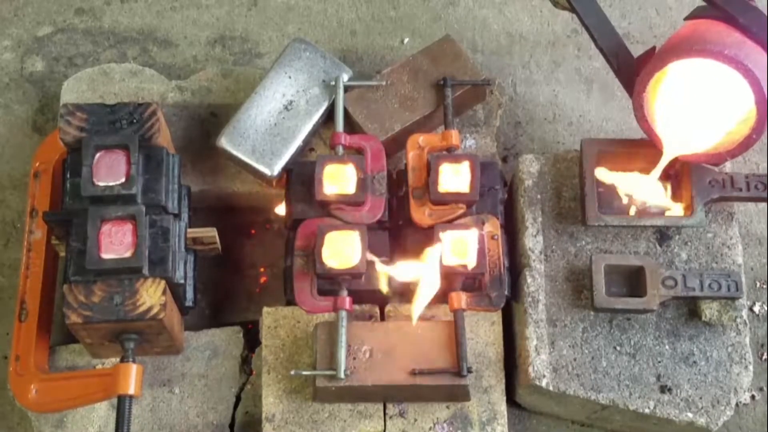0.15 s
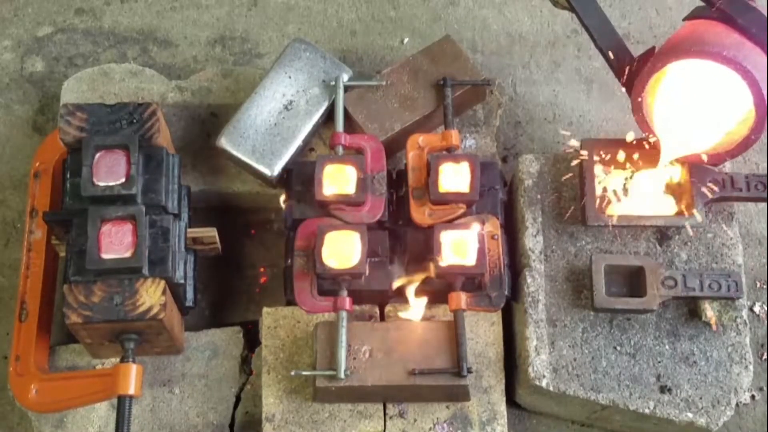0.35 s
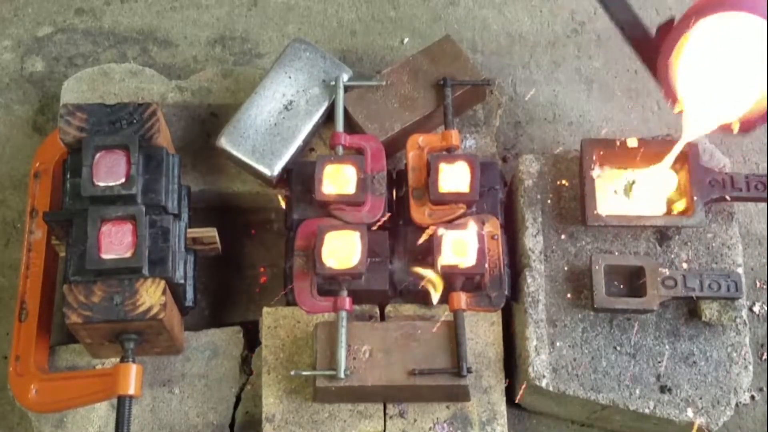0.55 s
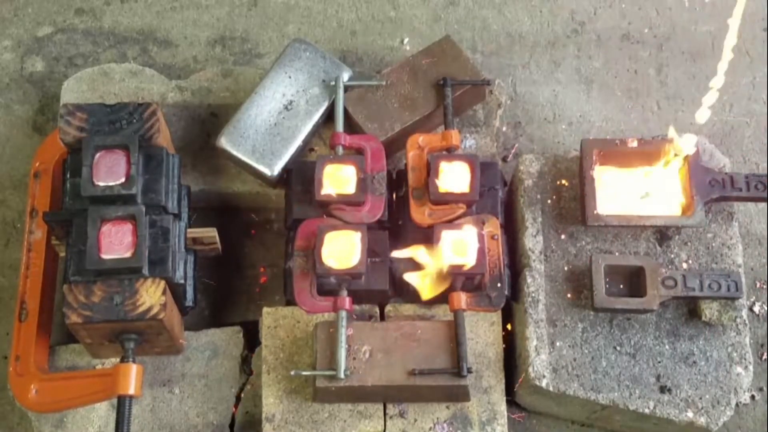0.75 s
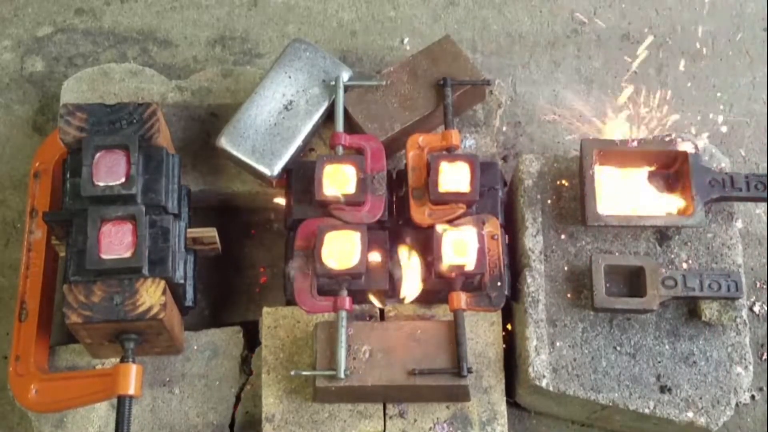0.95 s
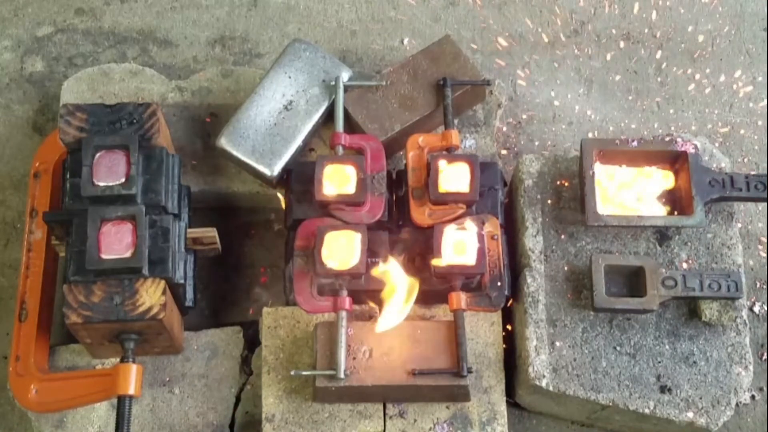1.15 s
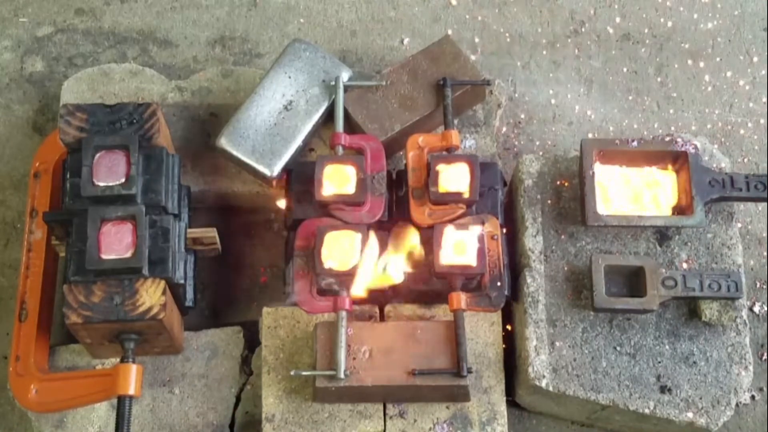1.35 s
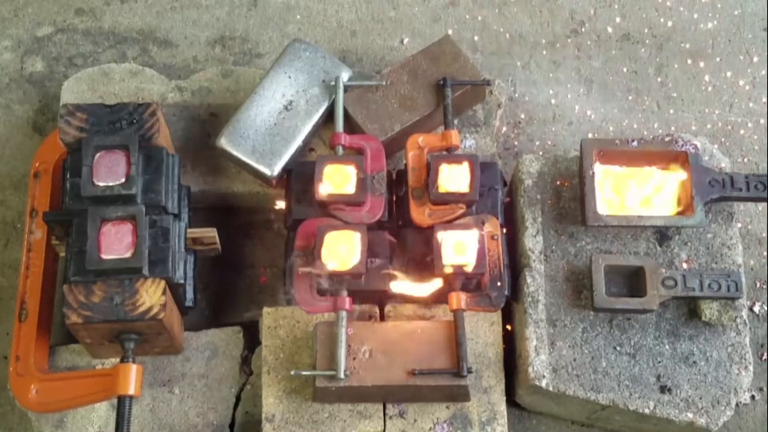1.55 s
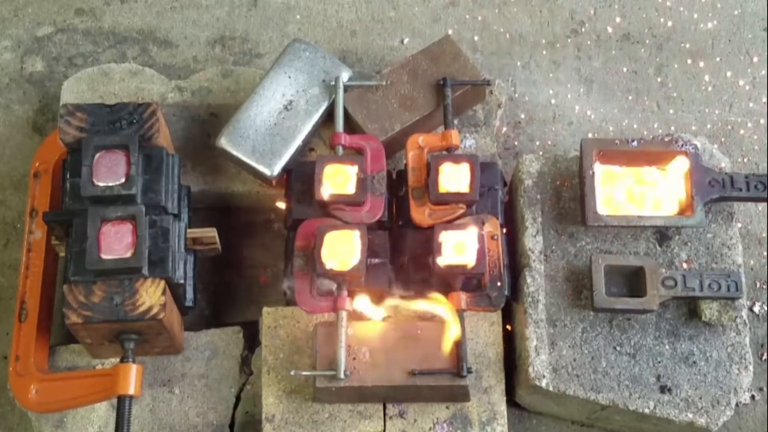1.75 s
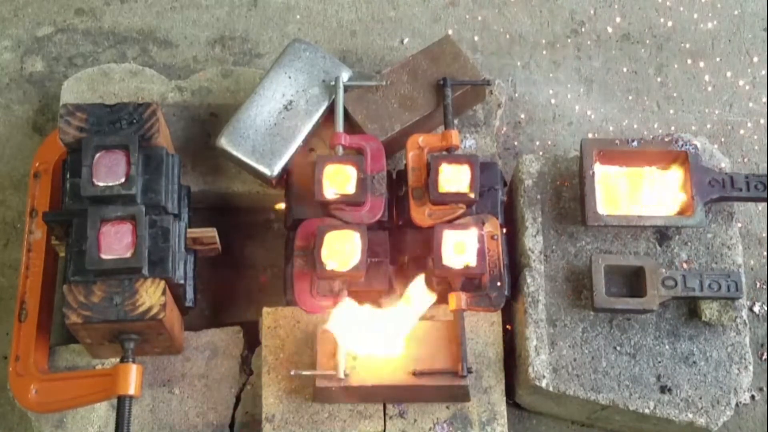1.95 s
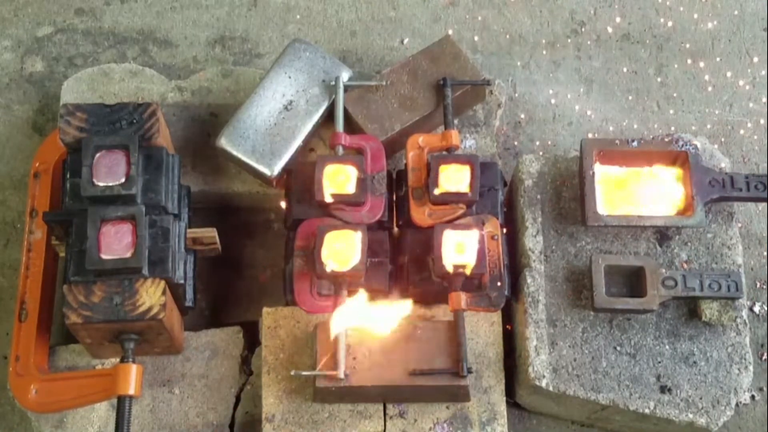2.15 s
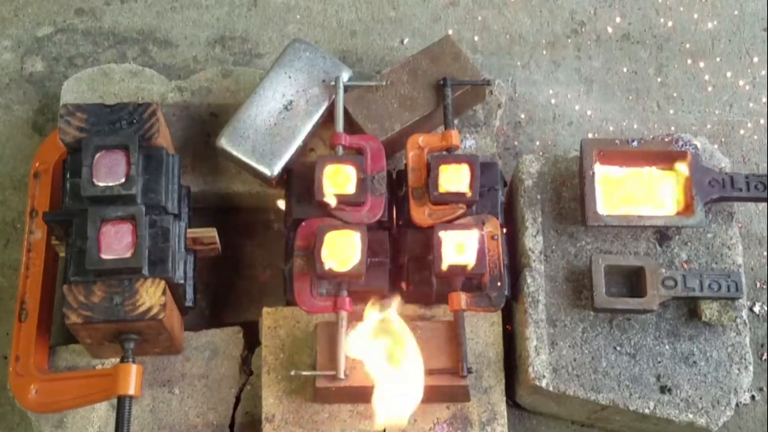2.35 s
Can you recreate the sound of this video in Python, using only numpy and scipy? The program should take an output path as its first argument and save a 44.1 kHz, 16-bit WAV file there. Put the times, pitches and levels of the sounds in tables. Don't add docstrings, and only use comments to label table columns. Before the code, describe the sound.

Molten metal bursts and sizzles into an iron mould with loud steam pops and spitting droplets

```python
import sys
import numpy as np
from scipy import signal
from scipy.fft import rfft, irfft
from scipy.io import wavfile

SR = 44100
rng = np.random.default_rng(int(sys.argv[2]) if len(sys.argv) > 2 else 0)


def unload_wav(signal):
    wavfile.write(
        sys.argv[1],
        SR,
        np.round(np.clip(np.atleast_2d(signal).T, -1, 1) * 32767).astype(np.int16),
    )


def level_to_linear(level):
    exponent = np.asarray(level, float) / 20
    return 10 ** exponent


N = 110250

# [f/Hz, likeness -1..1]
LIKENESS = [(60, 0.37), (240, 0.84), (950, 0.28), (3770, 0.09), (15000, -0.21)]
ONSET_S = .0008


def unit_rms(x):
    return x / np.sqrt(np.mean(x ** 2) + 1e-20)


def in_time(rows):
    s, level_db = np.transpose(rows)
    return np.interp(np.arange(N) / SR, s, level_db)


def at_hz(points, hz):
    points = np.array(points)
    return np.interp(np.log(hz), np.log(points[:, 0]), points[:, 1])


def drift(rate_hz):
    step, settle = 40, 2000
    r = np.exp(-2 * np.pi * rate_hz * step / SR)
    white = rng.standard_normal(N // step + settle + 2)
    slow = signal.lfilter([1], [1, -2 * r, r * r], white)[settle:]
    return np.interp(np.arange(N) / step, np.arange(len(slow)), unit_rms(slow))


def band(x, low, high):
    sos = signal.butter(2, [low, min(high, .45 * SR)], "band", fs=SR, output="sos")
    return signal.sosfilt(sos, x)


def ring(clicks, hz, t60):
    r = level_to_linear(-60 / (t60 * SR))
    w = 2 * np.pi * hz / SR
    return signal.lfilter([0, np.sin(w)], [1, -2 * r * np.cos(w), r * r], clicks + 1e-18)


def partly_alike(noise, low, high):
    mid, side = band(noise, low, high)
    alike = np.clip(at_hz(LIKENESS, np.sqrt(low * high)), -1, 1)
    return np.sqrt(1 + alike) * mid + np.sqrt(1 - alike) * side * [[1], [-1]]


def banded(spectrum, patchy_db, top_hz=20000., grains=0):
    out, power = 0, 0
    together = drift(14)
    edges = 24.5 * 2 ** np.arange(0, 10, .5)
    white = rng.standard_normal((2, 2, N)) + grains
    for k, (low, high) in enumerate(zip(edges, edges[1:])):
        hz = np.sqrt(low * high)
        if spectrum[0][0] < hz < spectrum[-1][0]:
            flicker_db = patchy_db * (.8 * together + .6 * drift(20))
            layer = level_to_linear(at_hz(spectrum, hz) + flicker_db) * partly_alike(white[k % 2], low, high)
            dulling_db = -20 * np.maximum(np.log2(hz / top_hz), 0)
            out = out + layer * level_to_linear(dulling_db)
            power = power + np.mean(layer ** 2)
    return out / np.sqrt(power)


def place(s, shapes):
    out = np.zeros(N + SR)
    for start, shape in zip((np.asarray(s) * SR).astype(int), shapes):
        out[start:start + len(shape)] += shape
    return out[:N]


def clicks_at(rate, spread_db, shape):
    size_db = spread_db * np.minimum(rng.exponential(1, shape), 5)
    sizes = level_to_linear(size_db) * rng.choice([-1, 1], shape)
    return unit_rms(sizes * (rng.random(shape) < rate / SR))


def air():
    # [f/Hz, level/dB per Hz]
    floor_colour = [(15, -47), (25, -2.5), (123, -6), (157, -19), (277, -5.5), (1840, -13.5), (5570, -26),
                    (7110, -20.5), (16000, -23.5)]
    whine_hz, width_hz = 7150, 420
    whine = band(rng.standard_normal((2, N)), whine_hz - width_hz / 2, whine_hz + width_hz / 2)
    floor = level_to_linear(-61.5) * banded(floor_colour, patchy_db=.6)
    return floor + level_to_linear(-74.5 + 3.5 * drift(4)) * unit_rms(whine)


def workshop(x):
    # [delay left/s, delay right/s, level/dB]
    echoes = [(.0011, 0.0016, -23.5), (.0054, .0058, -15.5), (.0114, .0116, -11)]
    # [f/Hz, T60/s]
    room_t60 = [(300, 0.36), (1500, 0.37), (5000, 0.27), (14000, 0.13)]
    room_db, early_db, early_s, tail_starts_s = -2.5, 6, 0.0076, 0.0028
    wall_hz = 12900
    t = np.arange(SR // 2) / SR
    edges = 130 * 2 ** np.arange(0, 8.)
    white, tail = rng.standard_normal((2, 2, len(t))), 0
    for k, (low, high) in enumerate(zip(edges, edges[1:])):
        decay = 1000 ** (-t / at_hz(room_t60, np.sqrt(low * high)))
        tail = tail + partly_alike(white[k % 2], low, high) * decay
    early = 1 + level_to_linear(early_db) * np.exp(-t / early_s)
    build_up = 1 - np.exp(-(t / tail_starts_s) ** 2)
    tail = tail * early * build_up
    near = np.zeros_like(tail)
    for k, (left, right, db) in enumerate(echoes):
        near[[0, 1], [int(left * SR), int(right * SR)]] = level_to_linear(db) * (-1) ** (k + 1)
    energy = np.mean(np.sum(tail ** 2, axis=1))
    answer = level_to_linear(room_db) * tail / np.sqrt(energy) + band(near, 100, wall_hz)
    return signal.fftconvolve(x, answer, axes=1)[:, :N]


def slop():
    # [t/s, level/dB]
    vigour = [(0, -68), (.21, -68), (.3, -58.5), (.9, -56), (1.15, -58), (1.3, -60.5), (2.1, -61),
              (2.5, -62)]
    # [f/Hz, level/dB per Hz]
    flutter_colour = [(59, -46), (100, -5.5), (466, -1), (679, -8), (911, -4.5), (1130, -10.5), (5000, -21),
                      (6500, -70), (11000, -120)]
    glugs_per_s, glug_db, glug_cycles = 150, -4.5, 2.8
    level_db = in_time(vigour)
    born = clicks_at(glugs_per_s * level_to_linear(5 * drift(12)), 3.5, N)
    dealt = rng.integers(0, 12, N)
    glugs = 0
    for k, hz in enumerate(np.geomspace(350, 1300, 12)):
        glugs = glugs + ring(born * (dealt == k), hz, glug_cycles / hz)
    hum = level_to_linear(-8 + 2.5 * drift(10)) * unit_rms(ring(rng.standard_normal(N), 465, .09))
    wash = level_to_linear(level_db) * (banded(flutter_colour, patchy_db=1.5) + hum)
    return wash, level_to_linear(level_db + glug_db) * band(unit_rms(glugs), 300, 3000)


def sizzle():
    # [t/s, level/dB]
    vigour = [(0, -98), (.212, -87), (.216, -32), (.3, -41), (.46, -48), (.6, -46), (.75, -42.5),
              (.88, -47), (.95, -46), (1.14, -49), (1.22, -57), (1.5, -60.5), (1.8, -62.5), (2.1, -66),
              (2.5, -55.5)]
    # [f/Hz, level/dB per Hz]
    hiss_colour = [(1470, -15), (2500, -1.5), (4110, 0.5), (5190, -5), (8330, -4.5), (14700, -3.5),
                   (16000, 25)]
    grains_per_s, spread_db, grain_db = 700, 4.5, -2
    grains = level_to_linear(grain_db) * clicks_at(grains_per_s * level_to_linear(4 * drift(15)), spread_db, (2, N))
    return level_to_linear(in_time(vigour)) * banded(hiss_colour, patchy_db=2.3, grains=grains)


def jets():
    # [t/s, length/s, level/dB, from f/Hz, to f/Hz]
    vents = [
        (0.873, 0.093, -47, 820, 767),
        (1.253, 0.037, -53, 15300, 14200),
        (1.354, 0.42, -74, 3520, 3460),
        (1.694, .03, -56.5, 925, 895),
        (1.831, 0.017, -50.5, 744, 740),
        (2.132, 0.055, -58, 14200, 15300),
        (2.415, 0.097, -65.5, 5400, 6560),
    ]
    width, rise = 0.077, 0.31
    out = 0
    for s, length, db, from_hz, to_hz in vents:
        phase = np.clip((np.arange(N) / SR - s) / length, 0, 1)
        carrier = 2 * np.pi * np.cumsum(from_hz + (to_hz - from_hz) * phase) / SR
        a, b = band(rng.standard_normal((2, N)), 10, 20 + width * from_hz / 2)
        shape = np.minimum(phase / rise, 1) * np.sqrt(1 - phase)
        out = out + level_to_linear(db) * shape * unit_rms(a * np.cos(carrier) + b * np.sin(carrier))
    return out


def gushes():
    # [t/s, length/s, level/dB, top f/Hz]
    rushes = [
        (0.484, 0.16, -47, 2500),
        (0.659, 0.083, -42, 7260),
        (0.895, 0.041, -43, 1030),
        (0.911, 0.17, -42, 5100),
        (1.048, 0.084, -35, 7150),
        (1.31, 0.14, -47.5, 1200),
        (1.816, 0.02, -47, 1200),
        (1.93, 0.02, -44.5, 1070),
        (2.192, 0.15, -43.5, 2120),
        (2.417, .09, -50.5, 2320),
    ]
    # [f/Hz, level/dB per Hz]
    rush_colour = [(88, -18.5), (150, -14), (293, -6), (1040, -4), (1320, -6.5), (1740, -4), (9000, -17),
                   (11700, -11), (19800, -120)]
    rise = 0.29
    s, length, db, top_hz = np.transpose(rushes)[:, :, None]
    phase = (np.arange(N) / SR - s) / length
    swell = np.clip(phase / rise, 0, 1)
    sink_db = -14 * np.clip(phase - rise, 0, 9) ** 1.17
    shape = level_to_linear(db) * swell * level_to_linear(sink_db)
    total = shape.sum(axis=0)
    mean_top_hz = 1 + (shape * top_hz).sum(axis=0) / (total + 1e-12)
    grains = level_to_linear(-3) * clicks_at(600, 4.0, N)
    return total * banded(rush_colour, patchy_db=1.5, top_hz=mean_top_hz, grains=grains)


def puffs():
    # [t/s, peak level/dB, f/Hz]
    ignitions = [(.214, -39.5, 227), (0.27, -43, 209), (.677, -54.5, 250), (.929, -39, 325),
                 (1.064, -41, 196), (1.3726, -37.5, 424), (1.38, -43, 450), (1.544, -48.5, 199),
                 (1.8297, -38, 380), (1.914, -43, 400), (1.935, -55, 450), (1.945, -47, 483),
                 (2.059, -54, 390), (2.19, -38.5, 403), (2.211, -54, 138)]
    half = 600
    s, db, hz = np.transpose(ignitions)[:, :, None]
    u = np.pi * hz * (np.arange(2 * half) - half) / SR
    return place(s[:, 0] - half / SR, -level_to_linear(db) * (1 - 2 * u ** 2) * np.exp(-u ** 2))


def ticks():
    # [t/s, peak level/dB, pan/dB, lower part relative level/dB]
    droplets = [(0.2134, -23.5, -3, 1.5), (0.2703, -18.5, 8, -13.5), (0.345, -22.5, 2.5, -28),
                (0.3809, -20, -2, -20.5), (0.5281, -28.5, -14, -26), (0.553, -34, 9, -18),
                (0.5879, -34, -11, -19), (0.6129, -35, -16, -21), (0.6488, -24.5, -9, -39),
                (0.6763, -32.5, -8, -4), (0.7631, -26, -10, -23), (0.9289, -34.5, -0.5, -0.5),
                (1.0374, -37, -3, -13), (1.062, -37, 5, -8), (1.1292, -33.5, -7, -16),
                (1.213, -42, -2, -20), (1.258, -45, 7.0, -22), (1.3138, -44, 4, -21),
                (1.3475, -41, -1, -21), (1.3853, -45, 3, -20), (1.4542, -48, -8, -10),
                (1.6889, -49, 0, -13), (1.7728, -25, -1, -40), (1.8506, -42, 5.0, -20),
                (2.098, -55, 1.5, -21), (2.1434, -47, 6, -24), (2.1899, -48, 6, -11),
                (2.2936, -41, -1, -19),
                (.617, -39.5, -2, -2), (0.7722, -29.5, -7, -20), (.779, -29.5, -2, -16),
                  (0.935, -36, 3, -18), (0.981, -37, -3, -12), (.9935, -37.5, -5, -9), (1.879, -56, 0, -5),
                  (1.944, -50, 0, -22), (1.2651, -44, 0, -24)]
    tick_db, low_part_db, spit_db, decay_s = 11.5, 15.5, -10.5, .0005
    s, db, pan_db, low_db = np.transpose(droplets)
    decay = np.exp(-np.arange(200) / (decay_s * SR))
    burst = level_to_linear(spit_db) * rng.standard_normal((len(s), 200)) * decay
    burst[:, 0] = 1
    s = s + 1.398 * ONSET_S
    sides = []
    for sign in (1, -1):
        level_db = db + tick_db + sign * np.clip(pan_db, -6, 6) / 2
        heard = burst * level_to_linear(level_db)[:, None]
        bright = band(place(s, heard), 6500, 18000)
        lower = band(place(s, heard * level_to_linear(low_db + low_part_db)[:, None]), 2000, 7000)
        sides.append(bright - lower)
    return np.array(sides)


def pops():
    # [t/s, peak level/dB, cavity f/Hz, second mode relative
    # level/dB]
    bursts = [(0.017, -46.5, 1010, -5.5), (0.213, -9.5, 1184, 0), (0.27, -14.5, 1204, 1),
              (0.381, -29.5, 1070, 0), (0.619, -41, 730, 0.5), (0.648, -43, 650, -5),
              (0.674, -28, 660, -42), (0.773, -25, 1205, -3), (0.88, -39, 850, -4), (0.928, -24, 1160, -4),
              (0.979, -22.5, 1045, -7.5), (0.992, -32, 745, -9), (1.059, -36.5, 950, -1.5),
              (1.123, -31, 664, -20), (1.229, -34, 860, -27), (1.339, -33, 930, -35),
              (1.366, -40, 935, -20), (1.525, -30.5, 892, -6.5), (1.82, -44, 730, -15),
              (1.914, -43, 700, -26), (2.059, -58, 1220, -14), (2.118, -40, 716, -9),
              (2.165, -40, 555, -23), (2.189, -34.5, 594, -13), (2.214, -43, 654, -2),
              (2.223, -27, 1210, -5.5), (2.235, -28.5, 886, -1.5), (2.282, -24, 1200, -39),
              (2.341, -33.5, 1500, -36), (2.409, -29.5, 1034, -5),
              (.2130, -8.5, 2200, -1.5), (.2703, -22.5, 2180, 4), (.528, -41, 1780, -2),
                  (.5884, -32, 2980, -16), (.6488, -39, 1920, 2), (.664, -28.5, 1150, -19),
                  (1.398, -38, 2240, -1), (1.7730, -41.5, 2080, -2), (1.827, -49, 760, -18),
                  (1.836, -56, 720, -27), (1.921, -42, 640, -2), (1.929, -39.5, 920, -10),
                  (1.938, -38, 775, -22), (2.204, -40.5, 1020, 2.5), (2.211, -36, 1280, -6),
                  (2.216, -42, 895, -2), (2.436, -48, 1190, 2), (2.468, -48, 1550, -17),
                  (2.4870, -34, 1020, -5.5)]
    decay_cycles, pop_db = 6.24, 3.5
    mode_ratio, mode_db = 1.564, 1.62
    s, db, hz, second_db = np.transpose(bursts)[:, :, None]
    turns = hz * np.arange(900) / SR
    first = np.sin(2 * np.pi * turns)
    second = level_to_linear(second_db + mode_db) * np.sin(2 * np.pi * mode_ratio * turns)
    swell = 1 - np.exp(-turns / .3)
    shape = level_to_linear(db + pop_db) * (first + second) * 1000 ** (-turns / decay_cycles) * swell
    return band(place(s[:, 0] + ONSET_S, shape), 420, 7000)


def scene():
    mic_lag_s, puff_room_db, tick_room_db = .00007, -10.5, -7
    wash, glugs = slop()
    low = pops() + glugs
    high = ticks()
    puff = puffs()
    direct = low + high + puff
    direct[0] = np.roll(direct[0], int(mic_lag_s * SR))
    room = workshop(low + level_to_linear(puff_room_db) * puff + level_to_linear(tick_room_db) * high)
    return direct + room + wash + gushes() + sizzle() + air() + jets()


def band_limit(x):
    return signal.sosfilt(signal.butter(12, 17160, fs=SR, output="sos"), x)


def record(dry):
    # [f/Hz, left minus right level/dB]
    mic_balance = [(200, -2), (1500, -2.5), (5000, -3.5), (14000, 1.5)]
    cutoff_hz = 15900
    balance_db = at_hz(mic_balance, np.fft.rfftfreq(N, 1 / SR) + 1)
    tilt = level_to_linear(np.outer([.5, -.5], balance_db))
    x = .95 * np.tanh(irfft(rfft(dry) * tilt, N) / .95) - .0005
    low_pass = signal.cheby2(14, 36, cutoff_hz + 180, fs=SR, output="sos")
    return band_limit(signal.sosfilt(low_pass, x))


dry = scene()
out = record(dry)
unload_wav(out)
```